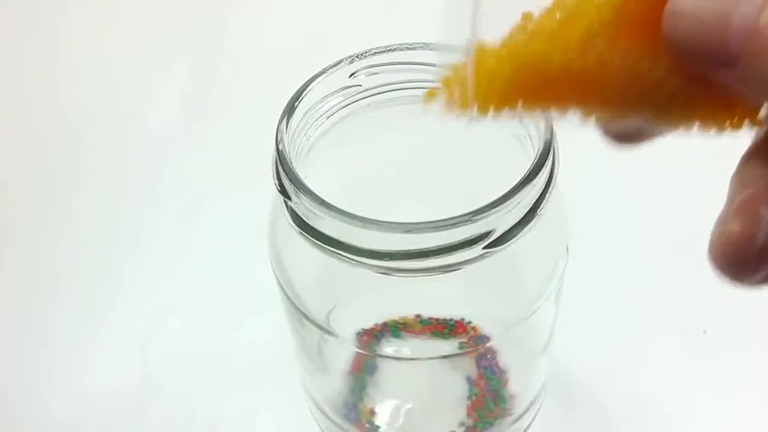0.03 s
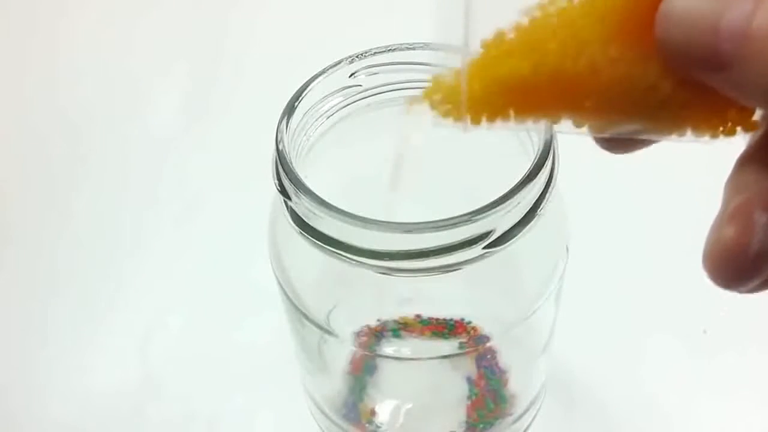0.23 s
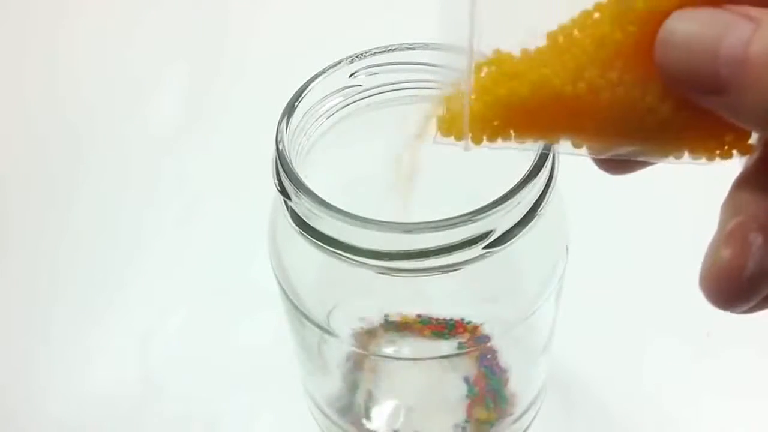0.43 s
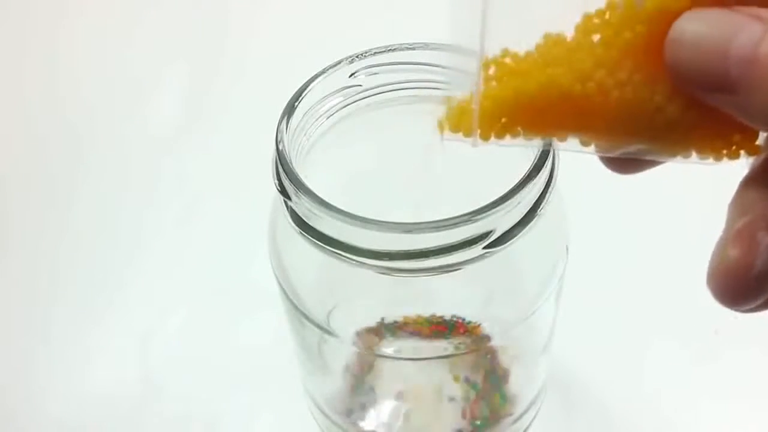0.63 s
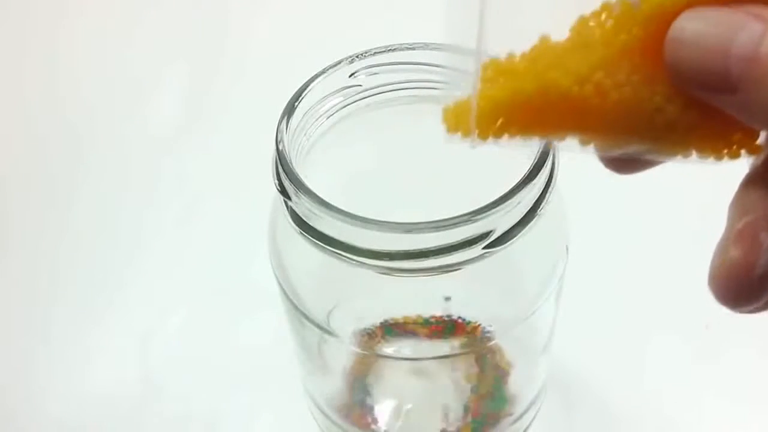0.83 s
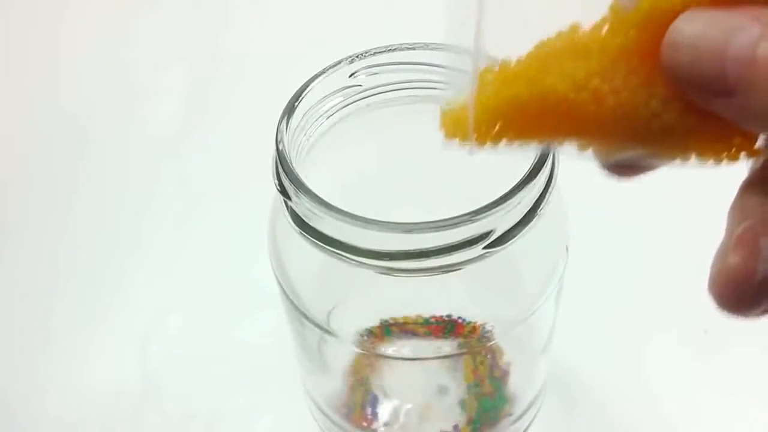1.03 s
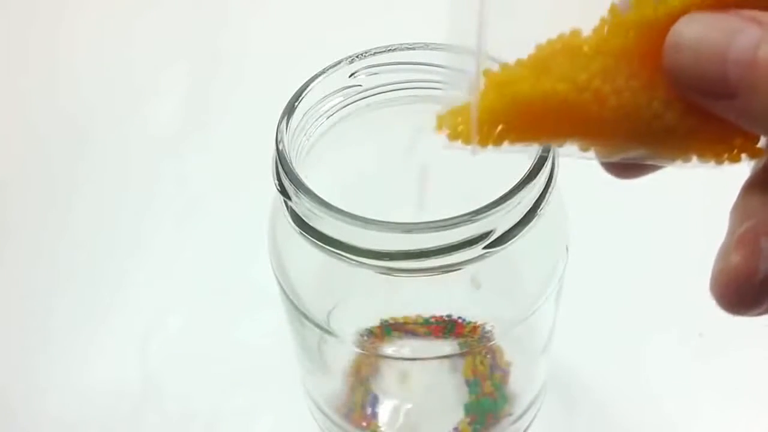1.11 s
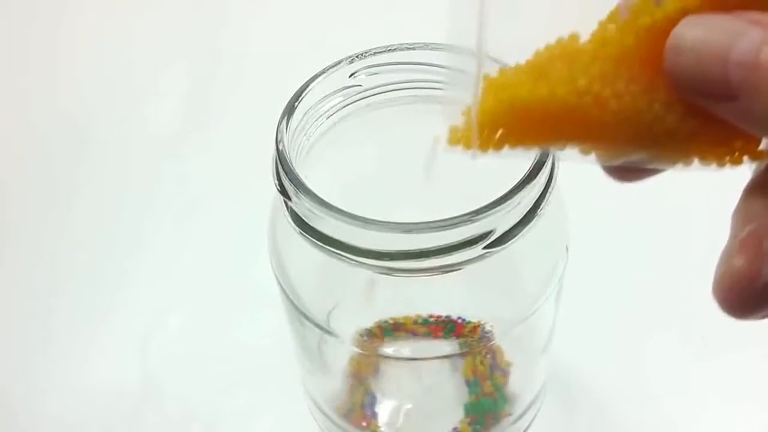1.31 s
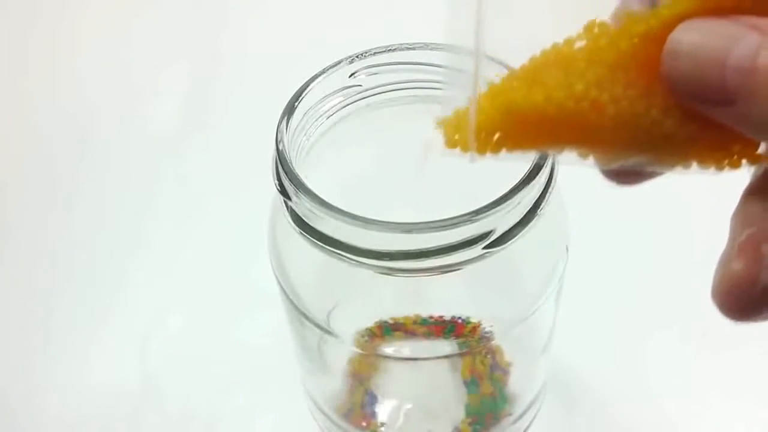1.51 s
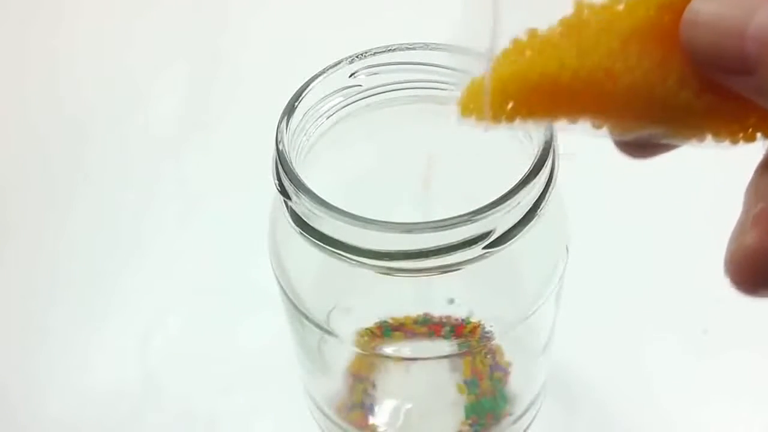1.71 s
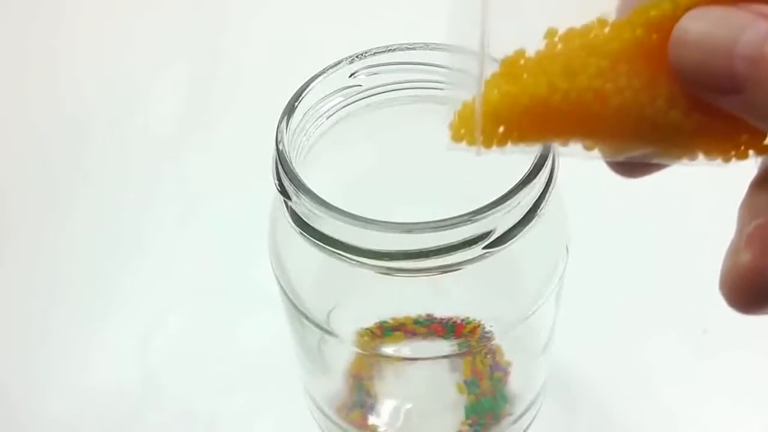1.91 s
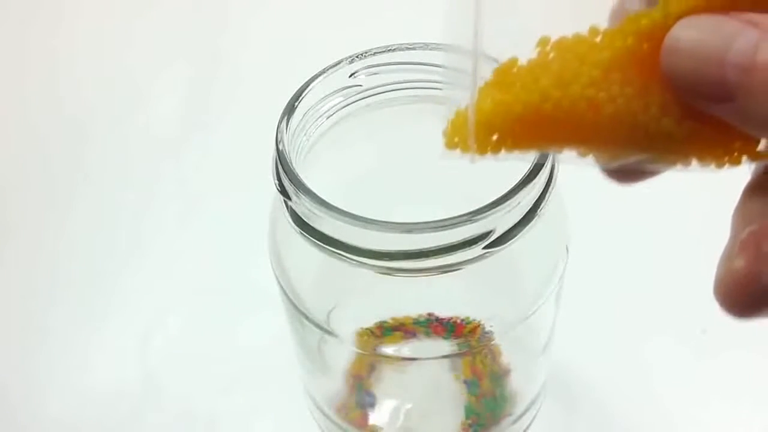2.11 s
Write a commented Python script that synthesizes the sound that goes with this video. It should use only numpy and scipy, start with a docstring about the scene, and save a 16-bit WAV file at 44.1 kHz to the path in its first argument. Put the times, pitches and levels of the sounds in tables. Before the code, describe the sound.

Small beads pour into a glass jar, close by, with short, very high clinks, brief rings off the wall and a fine rolling sizzle. They start at about 0.2 seconds, are thickest from 0.4 to 0.8, thin out, then pick up from 1.3 until around 2 seconds. A plastic bag crinkles from the start, with one soft handling bump near 1.1 seconds, over a low room tone.

```python
"""Beads into a glass jar

Small beads are shaken out of a plastic bag into a jar, close by in a quiet room. Each bead that
lands on the bottom gives a short, very high clink and skitters on; some fly against the wall, which
rings longer. Rolling beads add a fine sizzle. The bag crinkles in the hand over a low room tone."""
import sys
import numpy as np
from scipy import signal
from scipy.io import wavfile

SR = 44100
rng = np.random.default_rng(int(sys.argv[2]) if len(sys.argv) > 2 else 0)


def generate_wav(signal):
    """Clip the signal to [-1, 1] and save it as 16-bit WAV at the path in sys.argv[1]."""
    frames = np.transpose(np.atleast_2d(signal))
    scaled = np.clip(frames, -1, 1) * 32767
    pcm = np.round(scaled).astype(np.int16)
    wavfile.write(sys.argv[1], SR, pcm)


N = 94815

# room tone EQ and hum partials: f/Hz, level/dB
ROOM_EQ = [(20, -31), (40, -16), (58, -5.5), (75, -12), (110, -1), (150, -3), (210, -3), (270, -7),
           (340, -4), (470, -11.5), (620, -6.5), (780, -10.5), (1000, -16), (1500, -21.5), (3000, -34),
           (8000, -21), (16000, -34)]
ROOM_HUM = [(59, -56), (91, -52), (131, -58), (596, -58)]
# envelope of the bag's rustle: t/s, level/dB
RUSTLE_ENVELOPE = [(0, -46), (.15, -43.5), (.18, -50), (.24, -40), (.42, -43), (.52, -49), (.65, -53),
                   (.9, -56), (1.08, -49.5), (1.25, -54.5), (1.46, -55), (1.52, -48), (1.68, -46),
                   (1.78, -51), (1.92, -53), (2.07, -67), (2.15, -57)]
# snaps of the bag: t/s, level/dB, sharpness/dB
BAG_SNAPS = [(0.0259, -26, -36), (0.1225, -27.5, -14), (0.1859, -31.5, -8), (0.2293, -25, -25),
             (0.2712, -28, -2), (0.3106, -37, -15), (0.391, -20.5, -22), (0.4326, -25, -18),
             (0.4827, -30, -14), (0.4981, -25, -12), (0.596, -32, -7), (0.6118, -32, -6),
             (0.6589, -38.5, -11), (0.7685, -35.5, 12), (0.832, -39.5, 11), (0.9364, -26.5, 3),
             (1.0777, -34, -3), (1.5, -27, -19), (1.633, -29.5, -13), (1.682, -27.5, 0),
             (1.8585, -39.5, -6), (1.9092, -36, -9), (1.9594, -35, -8), (2.1292, -35, -6)]
# EQ of the plastic's body and of a snap's edge: f/Hz, level/dB
BAG_EQ = [(300, -13), (900, -5), (1300, -1), (1750, -7.5), (2300, 3.5), (2750, -0.5), (3700, -3.5),
          (6000, -6.5), (9000, -7.5), (12000, -14), (16000, -11)]
SNAP_EQ = [(500, -35), (1400, 4), (3000, -2), (4500, -1.5), (7000, -31), (12000, 8), (16000, -4)]
# envelope of the bouncing, rolling and grazing beads: t/s, level/dB
MOTION_ENVELOPE = [(0, -39.5), (.2, -47), (.25, -29.5), (.4, -28), (.5, -24), (.62, -24), (.8, -29),
                   (.96, -29), (1.1, -33), (1.22, -35), (1.33, -27.5), (1.5, -35), (1.63, -28),
                   (1.78, -31.5), (1.92, -36), (1.97, -39), (2.15, -35.5)]
# EQ of beads rolling on the heap: f/Hz, level/dB
ROLL_EQ = [(3000, -54), (6600, -48), (7500, -14), (8600, -10.5), (9400, -2.5), (10200, -4), (11000, -8),
           (12000, -24), (14200, -21), (15300, -7), (16500, -18)]
# wall hits: t/s, then level/dB for mode groups 0-3 (led by 7.4, 3.3, 11.3 and 8.1 kHz)
WALL_STRIKES = [(0.2611, -29, -38.5, -35, -35), (0.3115, -33, -50, -35, -35),
                (0.3579, -29, -37.5, -29.5, -32), (0.4113, -39, -47, -41, -39),
                (0.4596, -35, -46.5, -36, -33), (0.502, -34, -52.5, -44, -44),
                (0.5102, -27.5, -38.5, -26, -35), (0.5404, -34, -41, -31, -33),
                (0.5822, -36, -50, -38, -37), (0.5919, -25.5, -46, -37, -36), (0.6349, -28, -48, -37, -35),
                (0.6564, -30, -43.5, -42, -35), (0.6819, -33.5, -51, -35, -32),
                (0.7026, -35, -36.5, -35, -29.5), (0.749, -29, -61, -47, -36),
                (0.8021, -31.5, -53.5, -28.5, -29), (0.8422, -36, -42, -42, -33),
                (0.8777, -51, -55, -33, -51), (0.9267, -42, -43, -47, -40), (1.0011, -31, -45.5, -33, -34),
                (1.0898, -35, -37, -33.5, -35), (1.2181, -46, -50, -47, -54), (1.3232, -54, -53, -41, -44),
                (1.3671, -43, -45, -45, -48), (1.381, -34, -47, -35, -35.5), (1.4491, -41, -48, -32, -32),
                (1.5018, -44, -46.5, -48, -46), (1.5388, -35.5, -51, -41, -45),
                (1.5676, -53, -43, -36, -38), (1.6378, -34.5, -49.5, -35, -35.5),
                (1.6989, -40, -39.5, -35, -41), (1.7464, -49, -48, -46, -48),
                (1.8008, -35.5, -47, -40, -37), (1.8198, -39, -45.5, -45, -44),
                (1.8933, -31.5, -51, -40, -34), (1.9258, -31.5, -49, -38, -31.5),
                (1.9439, -55, -43.5, -48, -37.5), (2.0358, -32, -37, -31, -31)]
# modes of the wall: f/Hz, level/dB, t60/s, group
WALL_MODES = [(3291, 1, 0.33, 1), (7392, -1.5, .15, 0), (8070, -1, 0.17, 3), (8182, -7.5, 0.12, 3),
              (8700, -9, 0.12, 0), (9120, -12.5, .14, 3), (10352, -6, 0.2, 0), (11310, -10, 0.26, 2),
              (11357, 0.5, 0.091, 2)]
# beads landing on the bottom: t/s, level/dB, ring time/s, treble mode level/dB
LANDINGS = [(0.224, -11, 0.005, -18), (0.2373, -12, 0.0048, -17), (0.2577, -16.5, 0.0037, -17),
            (0.283, -27, 0.0042, 4), (0.3815, -14.5, 0.0074, -12), (0.4183, -16.5, 0.0067, -10),
            (0.4268, -20, 0.0059, -9), (0.4349, -20, 0.0075, 3), (0.4425, -2.5, 0.0109, -21),
            (0.4618, -15.5, 0.006, -16), (0.4685, -18, 0.0067, -11), (0.4781, -17, 0.0049, -4),
            (0.5161, -9.5, 0.0072, -24), (0.5453, -14, 0.0043, -20), (0.5623, -15, 0.0047, -8),
            (0.5804, -11.5, 0.0086, -13), (0.5955, -9, 0.011, -16), (0.6168, -12, 0.005, -20),
            (0.6592, -7, 0.011, -20), (0.6895, -18, 0.011, -6), (0.7037, -11.5, 0.0082, -10),
            (0.7287, -14, 0.018, -10), (0.754, -16, 0.008, -15), (0.7608, -21.5, 0.006, -12),
            (0.779, -10, 0.0097, -15), (0.8193, -24, 0.021, -16), (0.8338, -20, 0.0049, -15),
            (0.844, -11.5, 0.0072, -15), (0.893, -19, 0.0038, -7), (0.9204, -22, 0.0054, -26),
            (0.9269, -22, 0.0067, -10), (0.9448, -13, 0.0053, -19), (0.9533, -19.5, 0.0064, -12),
            (0.9644, -16.5, 0.0056, -10), (1.007, -25.5, 0.006, -8), (1.0295, -23.5, 0.0057, -10),
            (1.0822, -19, 0.0069, -9), (1.1338, -21.5, 0.0039, -11), (1.1572, -23, 0.0062, -6),
            (1.2547, -19, 0.0045, -7), (1.2772, -10, 0.0063, -18), (1.2891, -12, 0.0041, -17),
            (1.3, -28, 0.0043, 0), (1.3261, -11, 0.0035, -13), (1.3406, -16, 0.0066, -19),
            (1.35, -21, 0.0032, -13), (1.3945, -12.5, 0.003, -7), (1.4123, -18, 0.0048, -9),
            (1.4309, -13, 0.004, -24), (1.4604, -26, 0.0033, -13), (1.4753, -23.5, 0.0036, 4),
            (1.5, -15.5, 0.0044, -6), (1.5399, -12.5, 0.0044, -21), (1.5867, -22, 0.005, -4),
            (1.6082, -20, 0.006, -5), (1.6152, -10, 0.0044, -20), (1.6242, -22, 0.0045, -21),
            (1.7041, -12.5, 0.005, -15), (1.7431, -16, 0.005, -10), (1.7481, -12, 0.0046, -14),
            (1.8111, -17, 0.0045, -12), (1.8299, -16.5, 0.0042, -23), (1.8529, -12, 0.0045, -18),
            (1.878, -8, 0.0059, -17), (1.9121, -18, 0.0034, -8), (1.992, -23, 0.0032, -17),
            (1.9988, -11.5, 0.0032, -26), (2.0912, -37, 0.0028, -3), (2.109, -22, 0.0038, -13),
            (2.1233, -29, 0.0039, 1), (2.1422, -20.5, 0.0036, -9.5)]
# main and treble modes of the bottom: f/Hz, level/dB, factor on the ring time
BOTTOM_MODES = [(9775, -1, 1.05), (10030, -21, 0.99), (9620, -25, .8), (9340, -20, 1.7), (8200, -22, 0.73)]
TREBLE_MODES = [(15050, -0.5, 0.6), (15330, -4.5, 0.79), (15900, -10, .9)]
# EQ of the contact tick: f/Hz, level/dB
TICK_EQ = [(500, -49), (3000, -17), (6500, -51), (7800, -23), (8700, -6), (9500, -13.5), (10600, -11),
           (12000, -18.5), (14000, 0), (15500, -2), (17000, -20)]


def amp(db):
    """Decibels to gain."""
    return 10 ** (np.asarray(db) / 20)


def unit(x):
    """Scales to rms 1."""
    return x / np.sqrt(np.mean(x ** 2) + 1e-20)


def add(mix, s, sound):
    """Mixes a sound in at s seconds."""
    part = mix[max(round(s * SR), 0):][:len(sound)]
    part += sound[:len(part)]


def fader(envelope, trim_db):
    """Gain per sample, riding a level envelope."""
    return amp(np.interp(np.arange(N) / SR, *np.transpose(envelope)) + trim_db)


def colour(x, eq):
    """Minimum-phase EQ of unit energy."""
    hz, db = np.transpose(eq)
    bins_hz = abs(np.fft.fftfreq(4096, 1 / SR))
    log_gain = np.log(amp(np.interp(np.log(bins_hz + 1), np.log(hz), db)))
    taps = np.fft.ifft(np.exp(np.conj(signal.hilbert(log_gain)))).real
    return signal.fftconvolve(x, taps / np.linalg.norm(taps))[:len(x)]


def burst(decay_s):
    """A tiny puff of noise that dies at once."""
    t = np.arange(SR // 50) / SR
    return rng.standard_normal(len(t)) * np.exp(-t / decay_s)


def crackle(per_s, spread_db):
    """Random tiny clicks of uneven size, rms 1."""
    sizes = amp(spread_db * np.minimum(rng.exponential(1, N), 5))
    signs = rng.choice([-1, 1], N)
    return unit(sizes * signs * (rng.random(N) < per_s / SR))


def reflections(x, t60, delay_s):
    """A dense reverb tail, as loud as its input."""
    t = np.arange(SR // 3) / SR
    taps = rng.standard_normal(len(t)) * np.exp(-np.log(1000) * t / t60) * (t > delay_s)
    return unit(signal.fftconvolve(x, taps)[:N]) * np.std(x)


def room_tone():
    """A steady bed of low noise with a faint hum."""
    t = np.arange(N) / SR
    air = unit(colour(rng.standard_normal(N + SR), ROOM_EQ)[SR:])
    hum = sum(amp(db) * np.sin(2 * np.pi * (hz * t + rng.random())) for hz, db in ROOM_HUM)
    return amp(-43) * air + hum


def handling_bump(at_s=1.146, hz=135.6, rise_s=0.014, decay_s=0.042):
    """One soft handling bump: a low tone roughened with rumble."""
    out, t = np.zeros(N), np.arange(SR // 3) / SR
    shape = np.minimum(t / rise_s, 1) * np.exp(-t / decay_s)
    noise = rng.standard_normal(len(t))
    rumble = unit(colour(noise, [(60, -31), (120, 4.5), (190, -9), (300, -18), (1000, -28)]))
    add(out, at_s, amp(-27) * shape * (np.sin(2 * np.pi * hz * t) + 0.61 * rumble))
    return out


def bag():
    """The plastic crinkles densely in the hand, with single bright-edged snaps on top."""
    body = crackle(per_s=2200, spread_db=3) * fader(RUSTLE_ENVELOPE, trim_db=3.5)
    edge = np.zeros(N)
    for s, db, sharp_db in BAG_SNAPS:
        add(body, s, amp(db - 2) * burst(decay_s=0.0043))
        add(edge, s, amp(db + sharp_db - 13.5) * burst(decay_s=0.0043))
    return colour(body, BAG_EQ) + colour(edge, SNAP_EQ)


def rolling():
    """Beads roll and settle against each other: a fine, high sizzle."""
    clicks = crackle(per_s=1300, spread_db=1) * fader(MOTION_ENVELOPE, trim_db=-10)
    return colour(clicks, ROLL_EQ)


def jar_wall(grazes_per_s=100, contacts=4, skip_s=0.009, skip_db=-4, spread_db=0, rise_s=0.0013):
    """Flying beads skip along the wall, each spot ringing its own mix of modes; grazes add shimmer."""
    out, t = np.zeros(N), np.arange(SR // 2) / SR
    grazes = (rng.random(N) < grazes_per_s / SR) * fader(MOTION_ENVELOPE, trim_db=-21.5)
    skip_delays = skip_s * np.arange(contacts) * rng.uniform(0.75, 1.25, (len(WALL_STRIKES), contacts))
    for hz, mode_db, t60, group in WALL_MODES:
        group = round(group)
        graze_db = -9.5 if group == 1 else 0  # grazes drive the lowest mode less
        blows = grazes * amp(graze_db + 3 * rng.standard_normal(N))
        trim_db = (1.5, -1, 3, 2)[group]
        for (s, *levels), delays in zip(WALL_STRIKES, skip_delays):
            for skip, delay in enumerate(delays):
                blow_db = levels[group] + trim_db + skip * skip_db + spread_db * rng.standard_normal(1)
                onset = s + delay + rng.random() / hz  # up to a cycle late: random phase
                add(blows, onset, amp(blow_db))
        fade = np.exp(-np.log(1000) * t / t60) * (1 - np.exp(-t / rise_s))
        ring = amp(mode_db) * fade * np.sin(2 * np.pi * hz * t)
        out += signal.fftconvolve(blows, ring)[:N]
    return out


def clink(ring_s, treble_db, detune=0.0015, contact_s=0.0001):
    """The bottom rings for a few milliseconds until the loose beads choke it."""
    t = np.arange(SR // 25) / SR
    out = np.zeros(len(t))
    for modes, gain in ((BOTTOM_MODES, 1), (TREBLE_MODES, amp(treble_db + 0.5))):
        for hz, db, ring_factor in modes:
            cycles = hz * (1 + detune * rng.standard_normal()) * t + rng.random()
            choke = np.exp(-(t / (ring_s * ring_factor)) ** 2.47)  # holds, then drops fast
            out += gain * amp(db) * choke * np.sin(2 * np.pi * cycles)
    attack = 1 - np.exp(-(t / contact_s) ** 2)
    return out * attack


def skitter(per_s=230, spread_db=12, ring_s=0.0024, treble_db=-6, slots=1500):
    """Beads bounce about at random: short, mostly light hits, in rows like LANDINGS."""
    slot_s = N / SR / slots
    offsets, chances = rng.random((slots, 2)).T
    times = (np.arange(slots) + offsets) * slot_s
    accents_db = spread_db * np.minimum(rng.standard_normal(slots), 2)
    levels = np.interp(times, *np.transpose(MOTION_ENVELOPE)) - 13 + accents_db
    struck = chances < per_s * slot_s
    return [(s, db, ring_s, treble_db) for s, db in zip(times[struck], levels[struck])]


def jar_bottom():
    """Beads land and bounce on the glass; each contact is a tick and a clink."""
    rings, ticks = np.zeros(N), np.zeros(N)
    for s, db, ring_s, treble_db in list(LANDINGS) + skitter():
        add(rings, s, amp(db) * clink(ring_s, treble_db))
        add(ticks, s, amp(db - 5.5) * burst(decay_s=0.00039))
    return rings + colour(ticks, TICK_EQ)


def scene():
    """Mono mix of bag and jar over the background, with short jar and room reflections."""
    background = room_tone() + handling_bump()
    close = bag() + jar_wall()
    beads = jar_bottom() + rolling()
    close += beads + amp(-13) * reflections(beads, t60=0.07, delay_s=0.0023)  # inside the jar
    room_reverb = amp(-19.5) * reflections(close, t60=0.12, delay_s=0.0096)
    return (background + close + room_reverb)[None]


def record(dry):
    """A steep high cut takes off the very top."""
    taps = signal.firwin(301, cutoff=15900, window=("kaiser", 8), fs=SR)
    return signal.oaconvolve(dry, taps[None], "same")


dry = scene()
out = record(dry)
generate_wav(out)
```